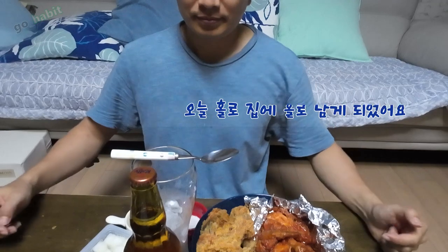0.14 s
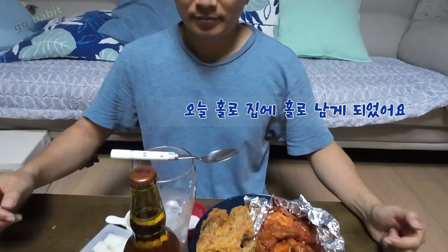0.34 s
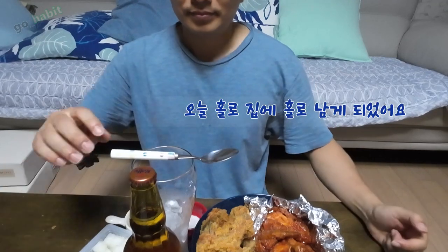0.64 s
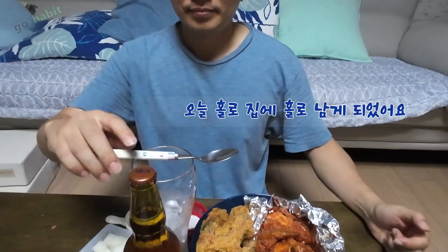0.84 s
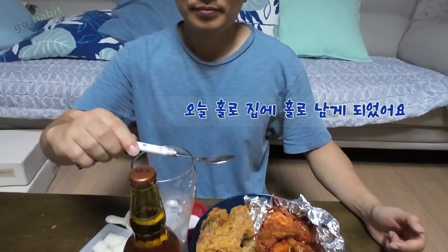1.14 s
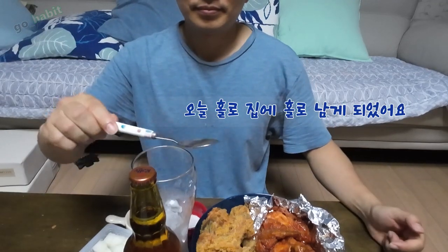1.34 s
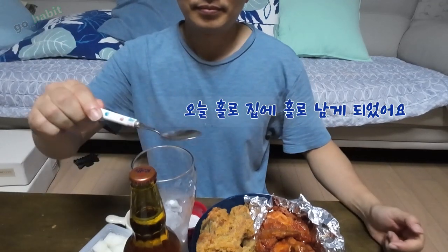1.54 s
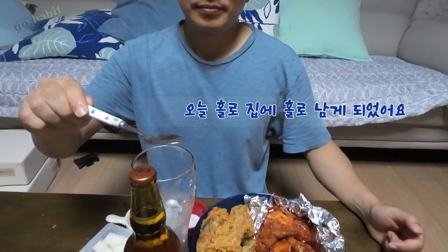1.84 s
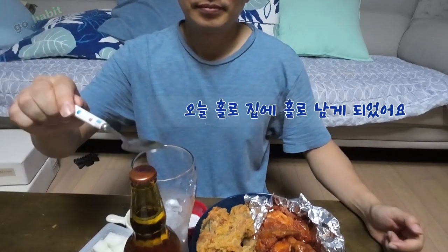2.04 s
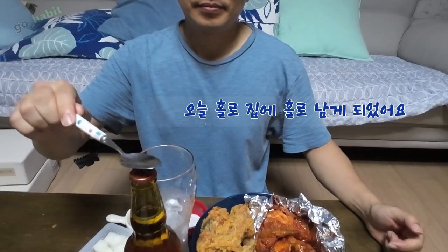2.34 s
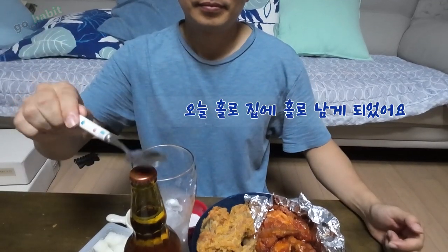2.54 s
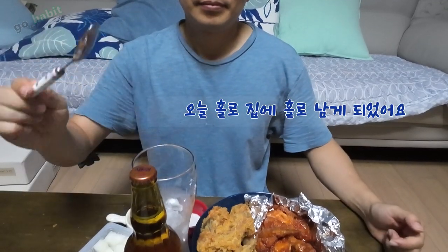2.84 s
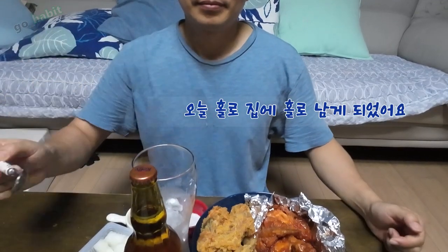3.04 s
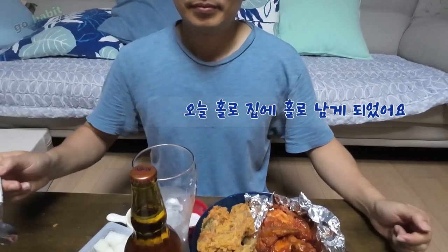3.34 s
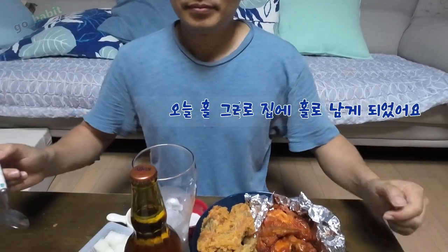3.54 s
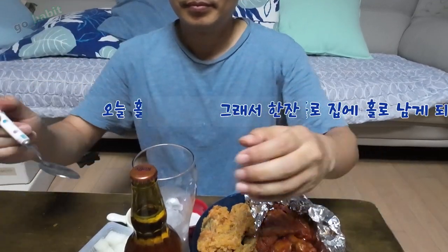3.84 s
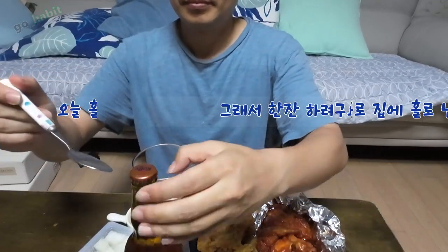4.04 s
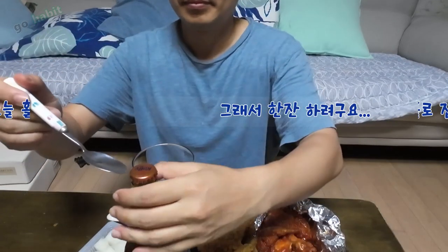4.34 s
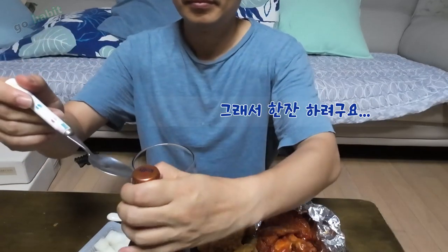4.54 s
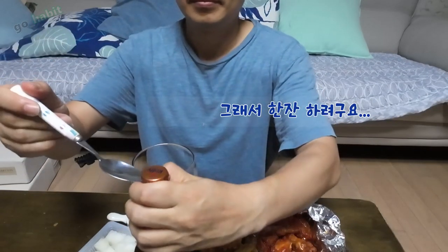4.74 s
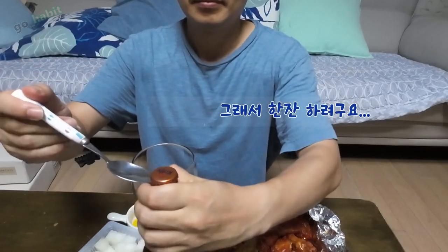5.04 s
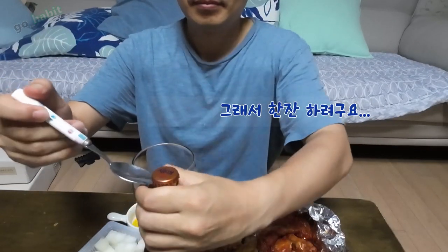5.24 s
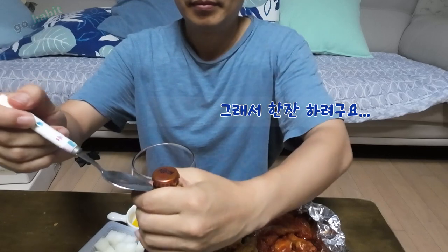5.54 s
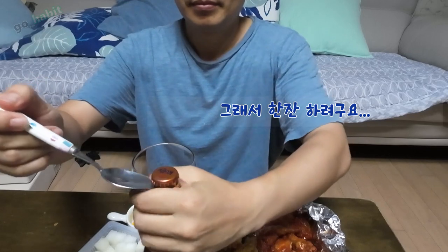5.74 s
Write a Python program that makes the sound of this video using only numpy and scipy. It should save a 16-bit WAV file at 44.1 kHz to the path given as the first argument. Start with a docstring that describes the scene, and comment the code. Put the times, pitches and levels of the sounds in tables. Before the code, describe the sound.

Quiet room: brief spoon scrape, three ringing glass knocks growing harder, soft table bumps, then scattered metallic cap clicks ending in a loud sharp snap.

```python
"""A steel spoon scrapes off the rim of a beer glass at a wooden table in a quiet living room, then strikes
the glass three times: cracks with clear ringing. Later it clicks, slips and bites under a bottle's crown cap.
Struck objects are sums of decaying sines; cracks, scuffs and thuds are shaped, dying noise. Blows thump
through the table, the room adds a tail, and a close, nearly mono microphone overloads on the hardest."""
import sys
import numpy as np
from scipy import signal
from scipy.fft import rfft, irfft
from scipy.io import wavfile

SR = 44100
rng = np.random.default_rng(int(sys.argv[2]) if len(sys.argv) > 2 else 0)


def unload_wav(signal):
    """Save mono or channel-first audio to the path in sys.argv[1] as 16-bit WAV at rate SR, clipped to [-1, 1]."""
    wavfile.write(
        sys.argv[1],
        SR,
        np.round(np.clip(np.atleast_2d(signal).T, -1, 1) * 32767).astype(np.int16),
    )


N = 259308
RING_SIZE = SR  # samples that a blow is followed for
AGE = np.arange(RING_SIZE) / SR  # seconds since the blow

# The steady hush of the room. Each row: frequency in Hz, relative density in dB per Hz.
AIR_SPECTRUM = [(15, -32), (25, -3), (229, -3.5), (335, -2.5), (363, -4.5), (394, -4), (530, -7.5),
                (1560, -14.5), (11200, -29.5), (16000, -37.5)]
AIR_DB = -57.5
# Hum of a household appliance. Each row: frequency in Hz, level in dB.
APPLIANCE_HUM = [(120, -68.5), (361, -66.5)]
# The room's tail by band. Each row: band centre in Hz, strength in dB, decay time t60 in seconds.
ROOM_BANDS = [(100, -13, 1), (400, -15.5, 0.77), (1500, -13.5, 1), (3300, -15, 1), (6000, -16.5, 1),
              (7500, -14, 1), (9600, -11.5, 1), (10600, -26, 0.18), (13000, -17.5, 0.5), (15340, -22.5, .4)]

# Strokes of the spoon's handle over the rim. Each row: start in seconds, length in seconds,
# level in dB before the swell.
HANDLE_STROKES = [(1.1, 0.07, -74), (1.21, 0.094, -52)]
SLIDE_ATTACK_S, SLIDE_RELEASE_S, SLIDE_SWELL_DB_PER_S = 0.0045, 0.0068, 48
# Light touches of the loose spoon. Each row: start in seconds, ring in dB, tick in dB.
SPOON_TOUCHES = [(1.2693, -37.5, -58), (1.287, -39.5, -48), (2.628, -62, -34), (3.224, -73, -47.5),
                 (3.318, -71, -51)]
# Modes of the loose spoon. Each row: frequency in Hz, level in dB, t60 in seconds before the fingers damp it.
SPOON_MODES = [(3190, -4, .48), (5960, -3, .33), (6020, -6, 1.3), (6121, -3, .15), (7553, -24, .5),
               (9109, -14, 1.3), (10450, -21, .33), (12400, -23, .15), (14000, -25, .15)]
# Spectrum of the handle's rasp. Each row: frequency in Hz, relative density in dB per Hz.
RASP_SPECTRUM = [(300, -22), (650, 13), (950, 2), (1250, 10), (1500, 0), (1750, 13), (2600, -19), (4000, 2),
                 (6000, -1), (12000, -18), (15500, -28)]

# Spoon on glass. Each row: start in seconds, ring in dB, lift of the favoured modes in dB, clack in dB,
# tilt of the clack in dB per octave.
GLASS_TAPS = [(2.1963, -25.5, 6, -14, -0.37), (2.4329, -18.5, 9, -7, -0.5), (2.6643, -17.5, 2, -3, 2.5)]
TAP_FAVOURED_HZ = 3257
TAP_THUMP_DB = -17.5  # relative to the clack
# Modes of the glass. Each row: frequency in Hz, level in dB before the lift, t60 in seconds.
GLASS_MODES = [(1064, -7, .17), (1101, -1, .48), (2239, -12, .58), (3257, 1, .27), (3271, -11, .55),
               (4448, -7, .38), (4712, -7, .33), (4684, -13, .22), (6162, -9, .28), (6356, -13, .48),
               (6570, -15, .5), (8727, -12, .45), (8793, -13, .45), (9157, -14, .6), (9351, -15, .6)]
# Dense, quickly dying vibration of a knock. Each row: frequency in Hz, relative density in dB per Hz before tilt.
CLACK_SPECTRUM = [(100, -6), (400, 2.5), (850, -17.5), (1100, 2.5), (1550, 2), (2400, -3), (3100, 0),
                  (3900, -10.5), (6000, 0), (7300, -10), (8800, 5), (10500, -5.5), (15500, -10.5)]
# Modes of the table top. Each row: frequency in Hz, level in dB, t60 in seconds before any muffling.
TABLE_MODES = [(47, -12, .42), (200, -8, .12), (218, 1, .23), (294, 0, .23), (327, 1.5, .24), (386, -4, .2),
               (448, -2, .25), (517, -7, .22), (716, -8, .25)]
# Dull body of the table. Each row: frequency in Hz, relative density in dB per Hz before tilt.
THUD_SPECTRUM = [(30, -26), (85, -14), (140, -13.5), (205, 2), (255, -13), (380, -1), (480, -1.5),
                 (600, -10), (1000, -28), (3000, -52)]

# Forearm settling on the table top: start in seconds, level in dB, frequency in Hz, t60 in seconds.
FOREARM_LEAN = (4.285, -47, 70, .35)
# Bottle and hand shifting on the table. Each row: start in seconds, table bump in dB, scuff in dB.
BOTTLE_NUDGES = [(4.281, -50, -76.5), (4.56, -41, -72), (4.77, -46, -61), (4.9, -42, -81),
                 (5.093, -39.5, -57.5), (5.12, -54.5, -40.5), (5.22, -43.5, -60), (5.238, -38.5, -51),
                 (5.377, -46.5, -50.5)]

# Spoon on cap. Each row: start in seconds, click in dB, spoon ring in dB, pitch of the cap's clack in Hz.
CAP_BITES = [(4.5648, -29.5, -48, 3330), (4.595, -32.5, -51, 5860), (4.602, -23.5, -49.5, 3324),
             (4.805, -9, -34, 6070), (5.4886, -33, -44, 3400), (5.4925, -16.5, -39.5, 6200),
             (5.497, -16.5, -40, 6050), (5.5539, -19, -33.5, 3398), (5.573, -27, -54, 3300),
             (5.652, -54, -51.5, 3440), (5.66, -39, -54.5, 6020), (5.792, -39, -48, 3350),
             (5.8047, -7.5, -44, 3240), (5.8208, -15.5, -41, 3384)]
HARD_CLICK_DB, BITE_BRIGHTENING = -7.5, 0.26  # softer bites are duller, by this many dB per octave for each dB
BOTTLE_RING_DB, BITE_THUMP_DB = -24.5, -27  # relative to the click
GRIP_DB_PER_S = 6.5  # the tightening hand mutes the bottle
CAP_CLACK_DB, CAP_CLACK_T60_S = 20.5, 0.07  # level relative to the spoon's ring
CONTACT_S = 0.00016  # time for the edge to press home
# Spectrum of the snapping cap. Each row: frequency in Hz, relative density in dB per Hz before tilt.
CLICK_SPECTRUM = [(200, -38.5), (450, -21.5), (720, -13), (1200, -17.5), (1700, -7), (2700, -7),
                  (3270, 13.5), (4100, -0.5), (5200, 0.5), (6050, 3.5), (7200, -14.5), (8800, 0),
                  (10800, -14), (12500, -11.5), (15500, -23)]
# Modes of the spoon wedged under the cap. Each row: frequency in Hz, level in dB, t60 in seconds.
WEDGED_SPOON_MODES = [(2940, -12, .25), (3232, -3, .2), (3309, 1, .42), (3380, -2, .09), (3644, -8, .17),
                      (3752, -10, .2), (4710, -14, .45), (4980, -16, .33), (6002, 0, .22), (6035, -9, .8),
                      (6163, 0, .35), (8680, -13, .5), (9130, -14, .5)]
# Modes of the bottle. Each row: frequency in Hz, level in dB, t60 in seconds.
BOTTLE_MODES = [(2226, -0.5, 0.6), (5130, -11, 0.3), (6610, -12, 0.3), (9290, -15, 0.91)]
# The spoon skids free of the cap and sings: start in seconds, level in dB, frequency in Hz, t60 in seconds.
FREE_SKID = (5.8044, -26, 4712, .6)
# The edge grates over the crimps. Each row: start in seconds, length in seconds, level in dB before scatter.
CRIMP_GRATES = [(4.565, 0.017, -32), (4.596, 0.014, -37), (5.49, .015, -21.5), (5.803, 0.016, -18.5)]


def amp(db):
    """Decibels to gain."""
    return 10 ** (np.asarray(db) / 20)


def fade(t60):
    """Exponential decay after a blow, down 60 dB after t60 seconds."""
    return np.exp(-np.log(1000) * AGE / t60)


def onset(rise_s):
    """Smooth attack that approaches full level with a time constant in seconds."""
    return 1 - np.exp(-AGE / rise_s)


def octaves(size):
    """The spectrum's bins on a logarithmic pitch scale, where the tables are interpolated."""
    return np.log2(np.maximum(np.fft.rfftfreq(size, 1 / SR), 1))


def noise(spectrum, tilt_db=0, size=RING_SIZE):
    """Random-phase noise of rms 1 with a given spectrum, tilted by some dB per octave."""
    hz, db = np.transpose(spectrum)
    gain = amp(np.interp(octaves(size), np.log2(hz), db + tilt_db * np.log2(hz)))
    x = irfft(gain * np.exp(2j * np.pi * rng.random(len(gain))), size)
    return x / x.std()


def ring(modes, favoured_hz=1000, lift_db=0, reach=0.035):
    """Decaying modes that start together; the spot that is hit favours those near one pitch."""
    hz, db, t60 = np.transpose(modes)[:, :, None]
    closeness = np.exp(-(np.log(hz / favoured_hz) / reach) ** 2)
    level = amp(db + lift_db * closeness)
    return np.sum(level * fade(t60) * np.sin(2 * np.pi * hz * AGE), axis=0)


def add(track, s, sound):
    """Mix a sound into the track at time s."""
    start = int(s * SR)
    track[start:start + len(sound)] += sound[:N - start]


def room_hush():
    """Steady background noise of the room at unit gain times its level."""
    return amp(AIR_DB) * noise(AIR_SPECTRUM, size=N)


def appliance_hum():
    """A household appliance hums on steady sine tones."""
    time = np.arange(N) / SR
    return sum(amp(db) * np.sin(2 * np.pi * hz * time) for hz, db in APPLIANCE_HUM)


def slide_stroke():
    """Each stroke takes hold, swells as the hand presses on, and lets go."""
    stroke = np.zeros(N)
    for s, length_s, db in HANDLE_STROKES:
        swell = amp(db + SLIDE_SWELL_DB_PER_S * np.minimum(AGE, length_s))
        release = np.exp(-np.maximum(AGE - length_s, 0) / SLIDE_RELEASE_S)
        add(stroke, s, swell * onset(SLIDE_ATTACK_S) * release)
    return stroke


def spoon_lift(grain_db=4, rasp_db=-5):
    """The handle drags over the rim: tiny catches keep the spoon ringing, and a few touches tick."""
    stroke = slide_stroke()
    catches = rng.standard_normal(N) * amp(grain_db * rng.standard_normal(N))  # uneven sizes
    steel = ring(SPOON_MODES) * fade(0.064)  # the fingers damp it
    tones = signal.fftconvolve(stroke * catches / catches.std(), steel / np.linalg.norm(steel))[:N]
    knocks = amp(rasp_db) * stroke * noise(RASP_SPECTRUM, size=N)
    for s, ring_db, tick_db in SPOON_TOUCHES:
        add(tones, s, amp(ring_db) * ring(SPOON_MODES) * fade(1.0))
        add(knocks, s, amp(tick_db) * noise(CLACK_SPECTRUM, tilt_db=1.5) * fade(0.026))
    return np.array([knocks, tones])


def room_tail(build_s=0.0084):
    """Diffuse response of the room: each band has its own strength and decay."""
    hz, db, t60 = np.transpose(ROOM_BANDS)
    octave = octaves(RING_SIZE)
    white = rfft(rng.standard_normal(RING_SIZE))
    tail = 0
    for band, band_db, band_t60 in zip(np.eye(len(hz)), db, t60):
        shape = fade(band_t60) * onset(build_s)
        # one band's weight slopes to zero at its neighbours' centres
        band_noise = irfft(white * np.interp(octave, np.log2(hz), band), RING_SIZE)
        tail = tail + amp(band_db) * shape / np.linalg.norm(shape) * band_noise
    return tail


def table(thud_db, thud_t60, tilt_db, rise_s=0.0031):
    """The table top answers a blow a little late, with a few low modes and a dull thud."""
    thud = amp(thud_db) * noise(THUD_SPECTRUM, tilt_db) * fade(thud_t60)
    return (ring(TABLE_MODES) + thud) * onset(rise_s)


def glass_taps(crack_t60=0.024, rattle_db=-13, rattle_t60=.16):
    """Each tap cracks, leaves the glass ringing and drives its foot into the table."""
    knocks, tones = np.zeros((2, N))
    for s, ring_db, lift_db, clack_db, tilt_db in GLASS_TAPS:
        decay = fade(crack_t60) + amp(rattle_db) * fade(rattle_t60)
        clack = noise(CLACK_SPECTRUM, tilt_db) * decay
        thump = amp(TAP_THUMP_DB) * table(thud_db=3.5, thud_t60=.18, tilt_db=-0.5)
        add(knocks, s, amp(clack_db) * (clack + thump))
        add(tones, s, amp(ring_db) * ring(GLASS_MODES, TAP_FAVOURED_HZ, lift_db))
    return np.array([knocks, tones])


def nudges(scuff_t60=0.083):
    """The forearm settles, and the gripped bottle rocks on the table with soft bumps and scuffs."""
    out = np.zeros(N)
    s, db, hz, t60 = FOREARM_LEAN
    add(out, s, ring([(hz, db, t60)]) * (1 - fade(0.045)))
    for s, table_db, scuff_db in BOTTLE_NUDGES:
        bump = table(thud_db=6, thud_t60=0.18, tilt_db=-8.0, rise_s=0.012) * fade(0.23)
        scuff = noise(CLACK_SPECTRUM, tilt_db=-2.5) * fade(scuff_t60) * (1 - fade(.02))
        add(out, s, amp(table_db) * bump + amp(scuff_db) * scuff)
    return out


def cushioned(x, edge_hz=230, lift_db=3):
    """The hand around the bottle softens what reaches the table and adds its weight to it."""
    lowpass = signal.butter(4, edge_hz, fs=SR, output="sos")
    return amp(lift_db) * signal.sosfilt(lowpass, x)


def cap_levering(snap_t60=0.023, buzz_db=-14, buzz_t60=0.19):
    """The edge slips on the crimps; each slip snaps the cap, which clacks, and rings spoon and bottle."""
    knocks, tones = np.zeros((2, N))
    for s, click_db, spoon_db, cap_hz in CAP_BITES:
        decay = fade(snap_t60) + amp(buzz_db) * fade(buzz_t60)
        click = noise(CLICK_SPECTRUM, BITE_BRIGHTENING * (click_db - HARD_CLICK_DB)) * decay
        cap_clack = ring([(cap_hz, spoon_db + CAP_CLACK_DB, CAP_CLACK_T60_S)])
        snap = (amp(click_db) * click + cap_clack) * onset(CONTACT_S)
        thump = cushioned(table(thud_db=2.5, thud_t60=0.25, tilt_db=1.5))
        add(knocks, s, snap + amp(click_db + BITE_THUMP_DB) * thump)
        bottle_db = click_db + BOTTLE_RING_DB - GRIP_DB_PER_S * (s - CAP_BITES[0][0])
        add(tones, s, amp(spoon_db) * ring(WEDGED_SPOON_MODES) + amp(bottle_db) * ring(BOTTLE_MODES))
    s, db, hz, t60 = FREE_SKID
    add(tones, s, ring([(hz, db, t60)]))
    return np.array([knocks, tones])


def crimp_grating(count=4, tilt_db=11, tick_t60=0.015, scatter_db=2, jitter_s=0.0016):
    """Skating over the crimps, the edge sheds a quick, uneven run of thin ticks."""
    out = np.zeros(N)
    for s, length_s, db in CRIMP_GRATES:
        scatter = rng.standard_normal((count, 2))
        for delay, (late, size) in zip(np.linspace(0, length_s, count), scatter):
            tick = noise(CLICK_SPECTRUM, tilt_db) * fade(tick_t60)
            add(out, s + delay + jitter_s * abs(late), amp(db + scatter_db * size) * tick)
    return out


def scene(tone_room_db=-5, side_db=-3.5, air_side_db=-19):
    """All sources sit in the middle; only the room and its steady hush have a little width."""
    knocks, tones = spoon_lift() + glass_taps() + cap_levering()
    knocks = knocks + crimp_grating() + nudges()
    spill = knocks + amp(tone_room_db) * tones  # the ringing reaches the microphone mostly directly
    mid_room = signal.fftconvolve(spill, room_tail())[:N]
    side_room = signal.fftconvolve(spill, room_tail())[:N]
    mid = knocks + tones + mid_room + room_hush() + appliance_hum()
    side = amp(side_db) * side_room + amp(air_side_db) * room_hush()
    return np.array([mid + side, mid - side])


def record(dry):
    """The hardest blows clip at full scale, and the top is cut."""
    top_cut = signal.ellip(8, .2, 70, 15900, fs=SR, output="sos")  # steep low-pass, edge in Hz
    return signal.sosfilt(top_cut, np.clip(dry, -1, 1))


dry = scene()
out = record(dry)
unload_wav(out)
```